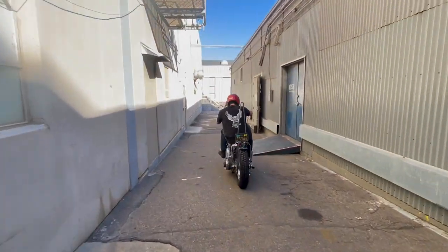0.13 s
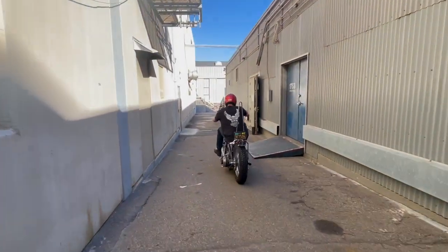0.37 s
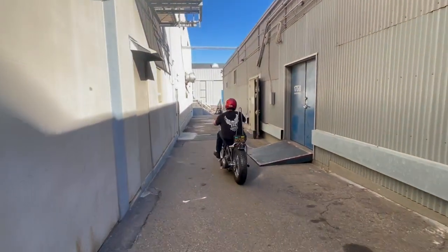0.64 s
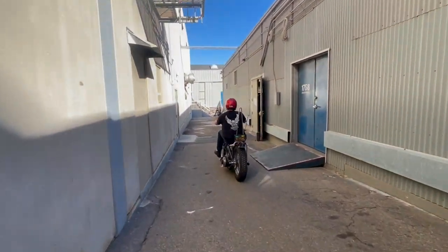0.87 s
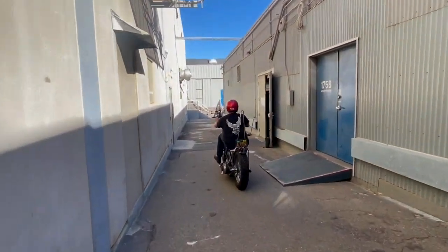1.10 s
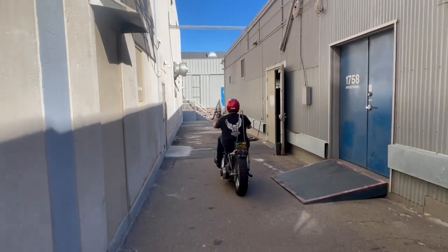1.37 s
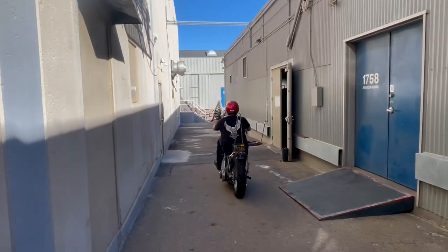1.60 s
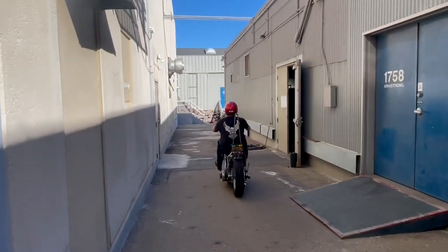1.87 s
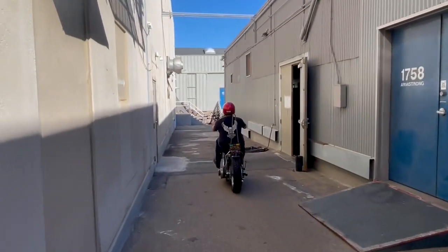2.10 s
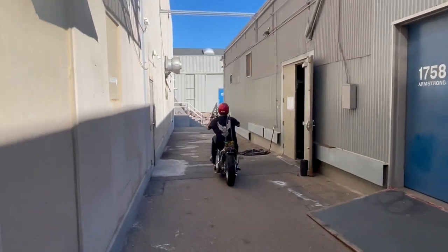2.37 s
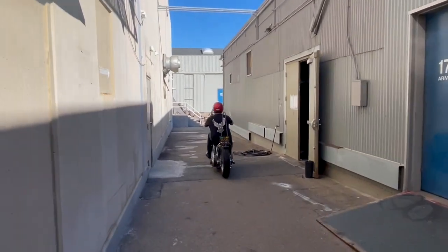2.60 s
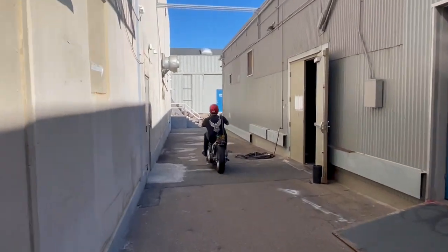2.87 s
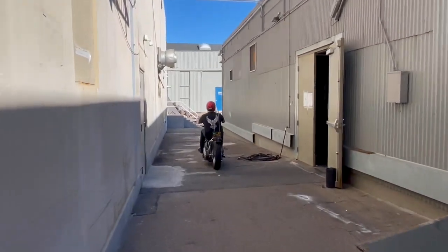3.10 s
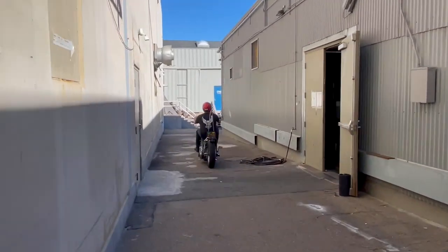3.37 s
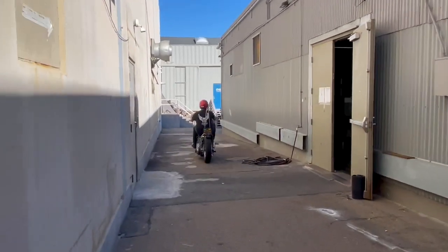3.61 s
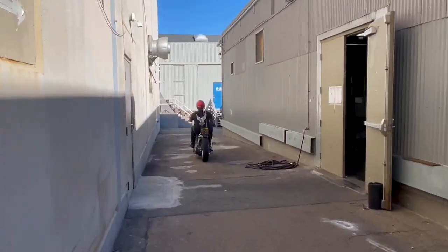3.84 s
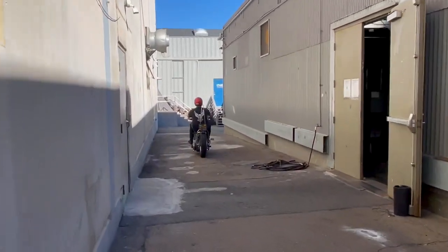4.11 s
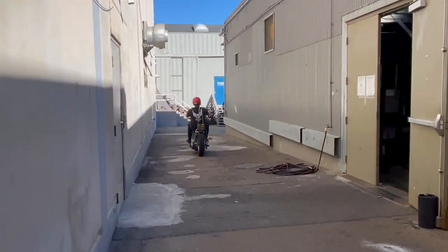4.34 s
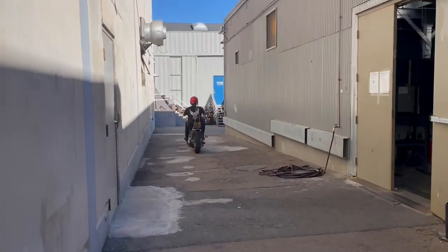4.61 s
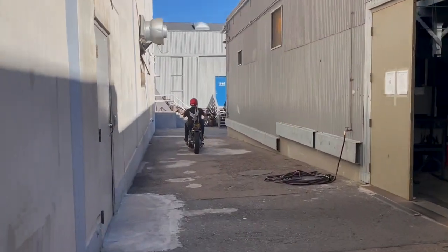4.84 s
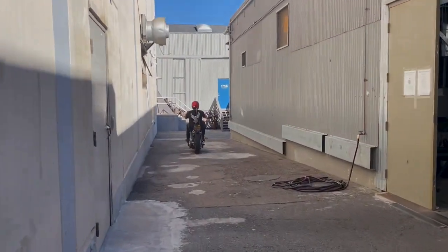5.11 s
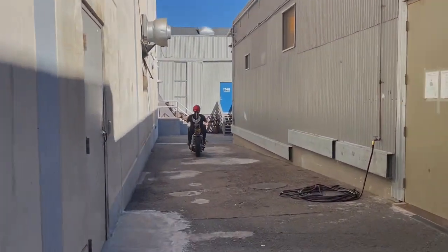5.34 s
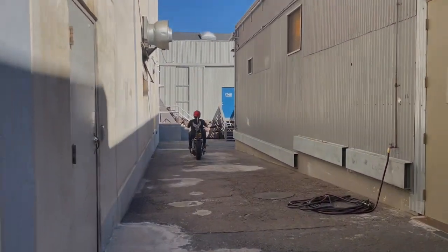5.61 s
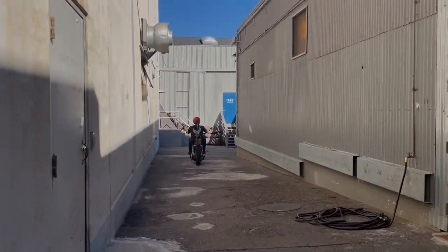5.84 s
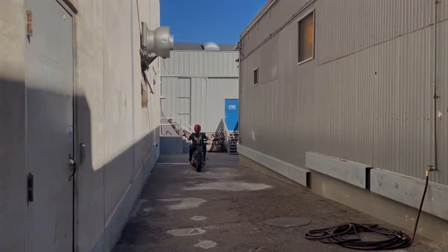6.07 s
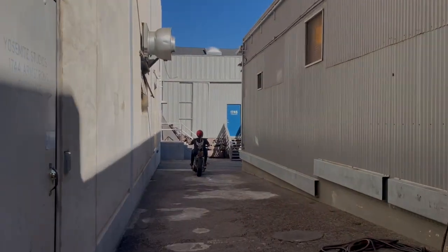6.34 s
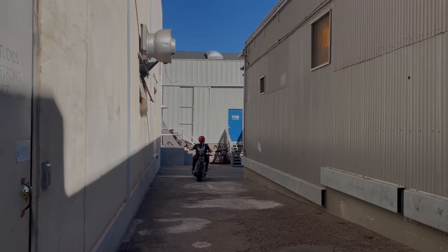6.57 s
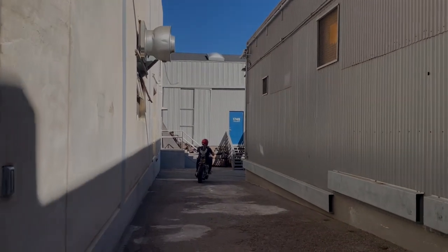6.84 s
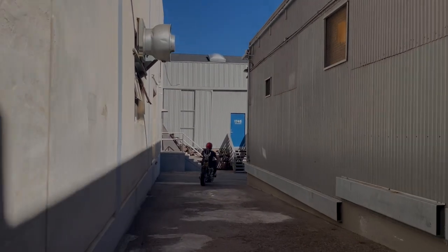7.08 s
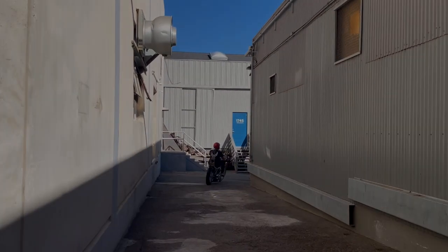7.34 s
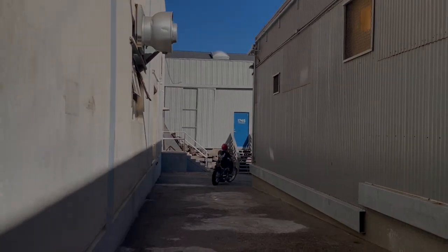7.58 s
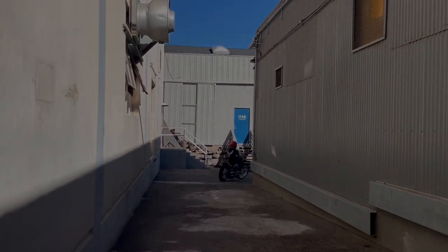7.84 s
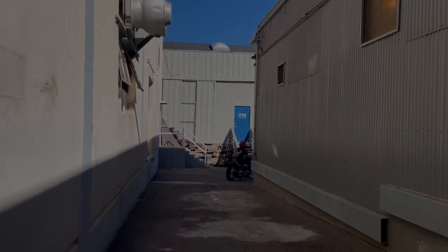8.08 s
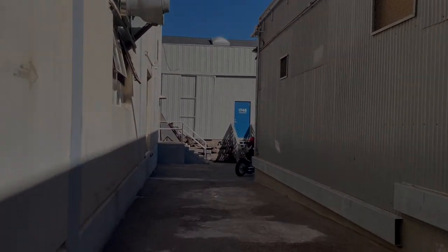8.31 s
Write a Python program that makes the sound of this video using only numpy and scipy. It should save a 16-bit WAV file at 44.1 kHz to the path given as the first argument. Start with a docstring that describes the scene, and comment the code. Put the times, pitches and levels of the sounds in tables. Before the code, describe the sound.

A V-twin motorcycle with loud open pipes rides away down a narrow alley of sheet metal and concrete, heard on a handheld stereo phone. At 0 s a hard crack and brief throttle burst give way to low, lumpy puffing and droning with small ticks. From 0.85 to 1.9 s bursts come close together, with bright rapid snaps, raspy barks, thumps and rushing gas, densest around 1.5 s. A weak blip at 2.1 s leads into a slow, stumbling lull; more bursts follow at 2.7-3.2, 3.7 and 4.2-4.4 s. It then coasts and slows, puffing deeply, until revs at 5.4-6.0 and 6.4-6.6 s. A strong, duller volley hits at 7.25-7.5 s, then a double blip at 8.1-8.45 s closes abruptly. Mechanical hiss and faint yard murmur run throughout, with wall echoes under a second long.

```python
"""A motorcycle with a V-twin engine and open pipes rides off down a narrow alley, followed on foot with a phone.
It opens with a crack and a short burst of throttle, over the hiss of chain, valves and tyres.
Off the throttle the pipes puff and drone; on each later burst the firings snap, bark and thump again.
The snaps get duller on average as it draws away, until a last double burst near the end.
Sheet-metal and concrete walls echo it all; two microphone ports hear it with different lag and level."""
import sys
import numpy as np
from scipy import signal
from scipy.fft import rfft, irfft, next_fast_len
from scipy.io import wavfile
from scipy.ndimage import uniform_filter1d, minimum_filter1d

SR = 44100
rng = np.random.default_rng(int(sys.argv[2]) if len(sys.argv) > 2 else 0)


def waveform_to_disk(signal):
    """Save audio, clipped to [-1, 1], as 16-bit WAV at the path in sys.argv[1]."""
    frames = np.transpose(np.atleast_2d(signal))
    scaled = np.clip(frames, -1, 1) * 32767
    samples = np.round(scaled).astype(np.int16)
    wavfile.write(sys.argv[1], SR, samples)


def field_ratio(decibels):
    """Amplitude ratio for a level in dB (20 dB per decade); scalars and array-likes work."""
    return 10 ** (np.asarray(decibels, dtype=float) / 20)


N = 372644  # length in samples


def curve(table, n):
    """Join (freq_hz, value) points on a log-frequency axis, one value per bin."""
    hz, value = np.transpose(table)
    return np.interp(np.log(np.fft.rfftfreq(n, 1 / SR) + 1), np.log(hz), value)


def colour(x, table):
    """Filter a sound by (freq_hz, level_db) points."""
    n = next_fast_len(x.shape[-1])
    return irfft(rfft(x, n) * field_ratio(curve(table, n)), n)[..., :x.shape[-1]]


def noise(table):
    """Coloured noise, rms 1."""
    x = colour(rng.standard_normal(N), table)
    return x / np.sqrt(np.mean(x ** 2))


def train(times, sizes):
    """One click per time."""
    out = np.zeros(N)
    np.add.at(out, np.clip((times * SR).astype(int), 0, N - 1), sizes)
    return out


def add(out, s, grain):
    """Mix a short sound in at time s."""
    i = max(int(s * SR), 0)
    out[i:i + len(grain)] += grain[:N - i]


def fall(x, seconds):
    """Every click dies away with this time constant."""
    return signal.lfilter([1], [1, -np.exp(-1 / (seconds * SR))], x)


def swell(x, rise_s, fall_s):
    """Every click rises, then dies away."""
    return fall(x, fall_s) - fall(x, rise_s)


def ring(times, sizes, modes, uneven_db, push_s):
    """Each soft push rings every mode of a pipe, a little differently every time."""
    chance = rng.standard_normal((len(times), len(modes)))
    out = 0
    for k, (hz, width_hz, db) in enumerate(modes):
        # a wider mode dies away sooner
        pole = np.exp((2j * np.pi * hz - np.pi * width_hz) / SR)
        blows = train(times, sizes * field_ratio(db + uneven_db * chance[:, k]))
        out = out + signal.lfilter([1], [1, -pole], blows).imag
    return uniform_filter1d(out, int(push_s * SR))


def walk(rate):
    """Random levels held 1 / rate s with sloping changes; spread near 1."""
    k = int(SR / rate)
    return uniform_filter1d(np.repeat(rng.standard_normal(N // k + 1), k), k)[:N]


def crackling(table, jump_db, shade_db, edges_hz):
    """Coloured noise in bands; the level of each jumps quickly and also shifts more slowly."""
    out, rest = 0, noise(table)
    for hz in edges_hz:
        band = signal.sosfilt(signal.butter(2, hz, fs=SR, output="sos"), rest)
        out = out + field_ratio(jump_db * walk(300) + shade_db * walk(35)) * band
        rest = rest - band
    return out + field_ratio(jump_db * walk(300) + shade_db * walk(35)) * rest


CRUISE_HZ = 12  # four-stroke cycles per second
# Engine speed over time: time_s, speed_hz (four-stroke cycles per second)
SPEED = [(0.0, 15.94), (0.56, 9.1), (0.76, 7.6), (1.0, 11.78), (1.4, 11.76), (1.68, 17.36), (1.8, 17.42),
         (1.88, 18.68), (2.2, 9.86), (2.48, 7.21), (2.6, 5.22), (2.76, 8.97), (2.84, 5.98), (3.2, 14.48),
         (3.48, 12.14), (3.64, 10.56), (3.8, 13.03), (4.2, 11.03), (4.28, 12.47), (4.4, 14.49), (5.4, 4.18),
         (5.64, 8.48), (5.76, 9.28), (6.0, 16.65), (6.4, 12.62), (6.64, 17.65), (6.72, 13.16), (6.8, 14.64),
         (7.2, 9.01), (7.28, 9.71), (7.5, 15.42), (7.76, 11.6), (8.12, 9.61), (8.45, 15.52)]


def octaves(s):
    """Engine speed at these moments, in octaves above cruising."""
    return np.log2(np.interp(s, *np.transpose(SPEED)) / CRUISE_HZ)


UPPER_DB_PER_OCT = 7.5  # the upper pipe modes grow with speed
# What the walls and road along the alley favour:
# time_s, upper_pipe_db, lowest_bark_db, road_dip_depth (0-1)
ALONG_ALLEY = [(0, 20.5, -2, 0), (.3, 15.5, -6, 0.3), (.9, 16.5, -12, 0.5), (1.4, 16, -15.5, 0.7),
               (1.9, 20.5, -42, 0.77), (2.3, 13.5, -8, 1), (2.7, 17, -13, 0.87), (3.1, 15.5, -9.5, 0.9),
               (3.8, 14, -5.5, 0.72), (4.3, 14.5, -4, 0.73), (5.0, 0, 8, 0.82), (5.6, 11, -5.5, 0.76),
               (6.0, 12, -4.5, 0.54), (6.5, 10.5, -8.5, 0.17), (7.4, 13.5, -14.5, 0.49),
               (8.3, 11.5, -13, 0.7)]


def ride(s):
    """Gains of the upper pipe modes and of the lowest bark mode at these moments."""
    at, upper_db, low_db, _ = np.transpose(ALONG_ALLEY)
    upper = field_ratio(np.interp(s, at, upper_db) + UPPER_DB_PER_OCT * octaves(s))
    return upper, field_ratio(np.interp(s, at, low_db))


CYCLE_AT_START, REAR_FIRES_AT = -.0142, .5744  # in cycles; the front cylinder fires at whole cycles
# Spans in which the engine skips every firing: start_s, end_s
MISFIRES = [(1.07, 1.2), (1.32, 1.37), (2.31, 2.36), (2.77, 2.92), (3.15, 3.19), (3.23, 3.26), (3.49, 3.53),
            (3.8, 3.83), (3.87, 3.91), (4.29, 4.33), (4.37, 4.4), (5.02, 5.1), (5.6, 5.67), (5.72, 5.78),
            (6.33, 6.37), (8.23, 8.27)]
# Bursts of throttle: open_s, shut_s, thump_db, bark_db, gas_db (relative levels)
BLIPS = [(0, 0.06, -14.5, -24.5, -25), (0.843, 1.06, -17, -21.5, -23.5), (1.203, 1.32, -16.5, -23.5, -25.5),
         (1.405, 1.7, -13, -21, -22.5), (1.71, 1.88, -15, -18, -34), (2.08, 2.17, -24, -19, -29),
         (2.66, 2.76, -11.5, -21, -21.5), (2.925, 3.23, -11, -25.5, -23.5),
         (3.676, 3.87, -11.5, -24.5, -32), (4.165, 4.44, -13, -18, -29.5), (5.44, 5.72, -11.5, -25, -28.5),
         (5.785, 6.03, -17, -28.5, -29.5), (6.396, 6.64, -15, -28, -34.5), (7.25, 7.53, -11, -20, -29.5),
         (8.085, 8.22, -16.5, -26.5, -35), (8.27, 8.45, -13, -19.5, -31.5)]


def crank():
    """Firing times, front cylinder or not, and the blip each falls in (-1: throttle shut)."""
    t = np.arange(N) / SR
    cycle = CYCLE_AT_START + np.cumsum(np.interp(t, *np.transpose(SPEED))) / SR
    whole = np.arange(int(cycle[-1]) + 1)
    due = np.ravel([whole, whole + REAR_FIRES_AT], order="F")
    due = due[due < cycle[-1]]
    s = np.interp(due, cycle, t)
    fired = ~np.any([(s > a) & (s < b) for a, b in MISFIRES], axis=0)
    blip = np.full(len(s), -1)
    for k, row in enumerate(BLIPS):
        blip[(s >= row[0]) & (s < row[1])] = k
    return s[fired], (due % 1 == 0)[fired], blip[fired]


def nearest(s, table):
    """Index of the firing that each row belongs to."""
    return np.abs(s[:, None] - np.array(table)[:, 0]).argmin(axis=0)


# ordinary firings; their snap gets duller as the bike draws away
SNAP_OVER_GAS_DB, SNAP_HZ, SNAP_FADE_OCT_PER_S = 12, 3120, 0.164
POWER_SCATTER_DB, GAS_SCATTER_DB = 4, 0.5
GAS_PER_PUNCH, BARK_PER_PUNCH = 0.3, 1  # dB per dB of extra thump
GAS_PER_SNAP = 0.17  # a harder snap carries more gas (dB per dB)
GAS_DB_PER_SNAP_OCT = 1.5  # a dull snap hisses less
REAR_BARK_DB = 4.5  # the rear pipe barks harder
BARK_PUSH_DB = 3  # push into the pipe above the listed bark level
# Cracks on the throttle, hard and faint:
# time_s, snap_db (relative), snap_hz, punch_db (thump above its blip's)
CRACKS = [(-.006, -1.5, 2730, 6), (.035, -15.5, 1155, -0.5), (.867, -9.5, 3440, 0.5),
          (0.908, -12.5, 3750, 3), (.963, -20, 4510, 2), (.999, -8.5, 1686, 6), (1.048, -18, 1160, 5),
          (1.223, -16.5, 2880, 1.5), (1.256, -12.5, 2570, 5.5), (1.305, -19.5, 3680, 0.5),
          (1.421, -8, 2020, 2), (1.468, -4, 2770, 3), (1.501, -4, 2015, 2.5), (1.542, -15, 2030, 4),
          (1.571, -0.5, 2070, 3.5), (1.607, -8, 3000, -4), (1.633, -2.5, 2100, 0.5),
          (1.67, -11.5, 3110, -4), (1.693, -3, 1980, 1), (1.727, -13, 2920, 1), (1.749, -6.5, 2170, -6),
          (1.805, -8.5, 2150, -2), (2.083, -25, 3450, -7), (2.688, -22, 3700, -3),
          (2.743, -11.5, 2650, -1.5), (2.951, -15.5, 3580, -4), (2.999, -15, 3440, -0.5),
          (3.056, -8.5, 985, 1), (3.092, -4, 2840, 3.5), (3.137, -3.5, 1046, 2.5),
          (3.209, -13.5, 3880, 1.5), (3.696, -19, 3830, 0.5), (3.731, -15.5, 3970, 0.5),
          (3.778, -12.5, 4700, -2.5), (3.855, -18.5, 5400, -1), (4.192, -7, 1470, -1.5),
          (4.23, -11, 3700, 3.5), (4.276, -2, 1078, 3), (4.353, -3, 1354, 4), (4.425, -19.5, 1080, 2.5),
          (5.491, -11.5, 940, 0.5), (5.576, -15, 1570, -1), (5.696, -7.5, 1013, -0.5),
          (5.804, -10.5, 1490, 7), (5.841, -8.5, 4140, 12), (5.887, -13.5, 1960, 7.5),
          (5.917, -7, 1780, 11), (5.957, -4, 1144, 12), (5.984, -3, 940, 3), (6.02, -29, 1890, 2.5),
          (6.391, -24, 1240, 8), (6.435, -9, 1570, 6), (6.467, -16.5, 1920, 3.5), (6.507, -13.5, 1560, 2.5),
          (6.537, -11.5, 1300, 9.5), (6.572, -13.5, 1565, -3), (6.596, -11.5, 1430, 4.5),
          (7.28, -10.5, 986, -1), (7.323, -7.5, 1450, 4), (7.372, -5.5, 1426, 2), (7.406, 0, 1570, 5),
          (7.449, -7, 1570, 3), (7.478, 1.5, 1492, 4.5), (8.112, -20, 3980, 1.5), (8.154, -15, 2570, 5.5),
          (8.205, -17, 1360, 4.5), (8.289, -20, 3700, 2), (8.324, -15.5, 1600, 3), (8.368, -9.5, 1620, 2),
          (8.396, -10, 1605, 6), (8.435, -21, 2600, 0)]
# Barks with a level of their own: time_s, bark_db (relative, before the push above)
BARKS = [(0.867, -23), (0.91, -22), (0.962, -19.5), (1.001, -12), (1.258, -18.5), (1.304, -18),
         (1.469, -8.5), (1.5, -21), (1.543, -6.5), (1.61, -8), (1.634, -15), (1.67, -11), (1.727, -11.5),
         (1.751, -14), (1.806, -17), (2.692, -25.5), (2.954, -19), (3.093, -21.5), (3.137, -18.5),
         (3.211, -14.5), (3.778, -21.5), (3.856, -20), (4.275, -21), (4.353, -15), (4.424, -19.5),
         (5.577, -18), (5.697, -20), (5.803, -16.5), (5.84, -13), (5.889, -10.5), (5.959, -10),
         (6.436, -13.5), (6.467, -12.5), (6.507, -16), (6.535, -17.5), (6.571, -17.5), (6.596, -13.5),
         (7.324, -17.5), (7.453, -14.5), (7.48, -14)]


def on_throttle():
    """Each firing takes its blip's levels, a little scattered; listed cracks and barks have their own."""
    s, front, blip = crank()
    is_open = blip >= 0
    chance = rng.standard_normal((len(s), 5))[is_open].T
    rear = ~front[is_open]
    s = s[is_open]
    thump_db, bark_db, gas_db = np.array(BLIPS)[blip[is_open], 2:].T
    snap_db = gas_db + SNAP_OVER_GAS_DB + GAS_SCATTER_DB * chance[0]
    snap_hz = SNAP_HZ * 2 ** (0.66 * chance[1] - SNAP_FADE_OCT_PER_S * s)
    punch_db = POWER_SCATTER_DB * chance[2]
    k = nearest(s, CRACKS)
    s[k], snap_db[k], snap_hz[k], punch_db[k] = np.transpose(CRACKS)
    bark_db = bark_db + BARK_PER_PUNCH * punch_db + REAR_BARK_DB * rear
    bark_db[nearest(s, BARKS)] = np.array(BARKS)[:, 1] + BARK_PUSH_DB
    extra_snap_db = snap_db - gas_db - SNAP_OVER_GAS_DB
    gas_db = gas_db + GAS_SCATTER_DB * chance[3] + GAS_PER_PUNCH * punch_db
    gas_db = gas_db + GAS_PER_SNAP * extra_snap_db + GAS_DB_PER_SNAP_OCT * np.log2(snap_hz / SNAP_HZ)
    return s, snap_db, snap_hz, gas_db, thump_db + punch_db, bark_db


def snap(s, snap_db, snap_hz):
    """The shock front leaves the pipe as a short pitched burst and a broad crack."""
    t = np.arange(int(0.01 * SR)) / SR
    shape = np.exp(-t / .0035) - np.exp(-t / .0012)
    crack_shape = np.exp(-t / 0.0019) - np.exp(-t / 0.0005)
    out = np.zeros(N)
    for at, db, hz in zip(s, snap_db, snap_hz):
        # turbulence makes the snap's pitch stumble
        stumble = np.cumsum(rng.standard_normal(len(t))) * .19
        add(out, at, field_ratio(db - 4.0) * shape * np.sin(2 * np.pi * hz * t + stumble))
        # the front itself is a broad, short crack
        rush = uniform_filter1d(rng.standard_normal(len(t)), size=5)
        add(out, at, field_ratio(db - 9) * crack_shape * rush)
        # a weaker second front of another pitch follows
        late_s, shift = rng.uniform(.004, .014), 2 ** rng.uniform(-0.79, 1.2)
        second = np.sin(2 * np.pi * hz * shift * t + stumble[::-1])
        add(out, at + late_s, field_ratio(db - 9.5) * shape * second)
    return out


# Colour of the rushing gas: freq_hz, level_db (per Hz, relative)
GAS = [(800, 3.5), (2100, -0.5), (2700, 1), (3800, 1), (5200, -1), (6100, 1), (7000, -3), (13500, -0.5),
       (15800, -3.5), (16600, -50)]


def gas_rush(s, gas_db):
    """Gas rushes out as crackling noise whose level jumps every few milliseconds."""
    # a second, uneven burst follows the first
    late_s, late_db = rng.uniform((.004, -11.), (.018, -1.), (len(s), 2)).T
    bursts = train(s, field_ratio(gas_db + 5.0)) + train(s + late_s, field_ratio(gas_db + 2.5 + late_db))
    edges_hz = [1300., 2170.0, 3200.0, 4480.0, 5170.0, 8700.0]
    return swell(bursts, .0018, .0055) * crackling(GAS, 4.26, 3.63, edges_hz)


# Pipe modes heard as the bark: freq_hz, width_hz, level_db (relative)
BARK = [(525.6, 62, 1.5), (600, 76, 4), (693, 82, -7)]


def bark(s, bark_db):
    """Each firing rings the middle pipe modes and adds a short burst of raspy noise."""
    low_gain = ride(s)[1]
    low = ring(s + 0.0023, field_ratio(bark_db + 3.5) * low_gain, BARK[:1], uneven_db=3.5, push_s=0.00017)
    high = ring(s + .002, field_ratio(bark_db - 6.0), BARK[1:], uneven_db=0.5, push_s=0.00072)
    rasp_colour = [(300, -9.0), (430, -29.0), (560, 3.0), (1300, -9.5), (2200, -48.0)]
    rasp = swell(train(s, field_ratio(bark_db - 4)), 0.0042, 0.0093) * noise(rasp_colour)
    return low + high + rasp


DEEP_FADE_DB_PER_S = .7  # the deepest pipe mode thins along the alley
# Low pipe modes, heard as the thump: freq_hz, width_hz, level_db (relative)
LOW_PIPE = [(62.4, 43, 5), (118.7, 22.6, 3.5), (157.6, 28, 3)]
# Upper pipe modes, heard as a growl on and off the throttle: freq_hz, width_hz, level_db (relative)
UPPER_PIPE = [(201.5, 34, -15.5), (238.8, 38, -15.5), (293.5, 47, -12)]


def thump(s, thump_db):
    """A slower push rings the low pipe modes, with a growl from the upper ones."""
    low = ring(s + 0.0058, field_ratio(thump_db - 5.0), LOW_PIPE[1:], uneven_db=2.0, push_s=0.0026)
    deep_size = field_ratio(thump_db - 1.5 - DEEP_FADE_DB_PER_S * s)
    deep = ring(s + 0.0059, deep_size, LOW_PIPE[:1], uneven_db=1.0, push_s=0.0034)
    growl_size = field_ratio(thump_db - 7.0) * ride(s)[0]
    growl = ring(s + 0.00581, growl_size, UPPER_PIPE, uneven_db=2.5, push_s=0.0017)
    return low + deep + growl


INTAKE_DB, INTAKE_LEAD_S = -9.5, 0.02  # relative to the gas; ahead of the first firing


def intake(s, gas_db):
    """The intake hisses as the throttle opens, just before the first firing."""
    first = np.diff(s, prepend=0) > .15  # seconds since the firing before it
    clicks = train(s[first] - INTAKE_LEAD_S, field_ratio(gas_db[first] + INTAKE_DB))
    return swell(clicks, 0.0022, 0.026) * noise([(1500, -20)] + GAS[2:])


def power_strokes():
    """The shock front snaps out of the pipe with a rush of gas; bark and slower thump follow."""
    s, snap_db, snap_hz, gas_db, thump_db, bark_db = on_throttle()
    strokes = gas_rush(s, gas_db) + bark(s, bark_db) + thump(s, thump_db) + intake(s, gas_db)
    return snap(s, snap_db, snap_hz), strokes


# Colour of the mechanical hiss and yard murmur: freq_hz, level_db (per Hz, relative)
GEAR = [(180, 4.5), (300, 3.5), (700, 1.5), (1200, -8), (3000, -12), (3600, -13), (4200, -18.5),
        (5300, -17), (5800, -10.5), (6400, -14), (7000, -22.5), (14000, -24), (16600, -46)]


def running_gear():
    """Chain, valves and tyres hiss louder the faster the engine turns, over a steady murmur of the yard."""
    flicker_db = 3.9 * walk(30) + 4.8 * walk(250)
    hiss = field_ratio(-46 + 20.0 * octaves(np.arange(N) / SR) + flicker_db)
    murmur = field_ratio(-51.0)
    return (hiss + murmur) * noise(GEAR)


# relative levels at cruising speed
PUFF_DB, PUFF_DB_PER_OCT, FRONT_PUFF_DB, PUFF_SCATTER_DB = -25.5, 5, 6.5, 1.5
TICK_DB, TICK_DB_PER_OCT, TICK_FADE_DB_PER_S, TICK_SCATTER_DB = -25, 2, 2, 1.5
PUFF_RECOVERY_DB_PER_S = 2.5  # growth since the throttle shut
PUFF_GAIN_DB_PER_S = .5  # growth along the alley, which guides the bass
# Stray pops with the throttle shut: time_s, tick_db, puff_db (relative levels)
STRAY_POPS = [(0.358, -20.5, -15.5), (0.797, -18, -15), (2.381, -26.5, -19.5), (2.446, -19.5, -15.5),
              (3.277, -26, -14), (3.64, -23.5, -14), (3.962, -26, -13.5), (4.452, -46, -10),
              (4.993, -23.5, -13.5), (6.241, -37, -12.5), (7.113, -30, -10.5), (7.948, -25, -11)]


def off_throttle():
    """Puffs and ticks follow the speed, the front cylinder puffs harder, ticks fade with distance."""
    s, front, blip = crank()
    shut = blip < 0
    chance = rng.standard_normal((len(s), 2))[shut].T
    s, front = s[shut], front[shut]
    puff_db = PUFF_DB + PUFF_DB_PER_OCT * octaves(s) + FRONT_PUFF_DB * front + PUFF_SCATTER_DB * chance[0]
    shut_s = np.array(BLIPS)[:, 1]
    since_s = s - shut_s[np.maximum(np.searchsorted(shut_s, s) - 1, 0)]
    puff_db = puff_db + PUFF_RECOVERY_DB_PER_S * since_s + PUFF_GAIN_DB_PER_S * s
    tick_db = TICK_DB + TICK_DB_PER_OCT * octaves(s) - TICK_FADE_DB_PER_S * s
    tick_db = tick_db + TICK_SCATTER_DB * chance[1]
    k = nearest(s, STRAY_POPS)
    s[k], tick_db[k], puff_db[k] = np.transpose(STRAY_POPS)
    return s, tick_db, puff_db, front


PUFF_RING_DB = 2.5  # the puff grows as its pitch steps up


def puff(s, puff_db, step_s):
    """Each weak firing is a soft tone whose pitch climbs to the pipe's drone."""
    t = np.arange(int(.25 * SR)) / SR
    shape = np.exp(-t / 0.049) - np.exp(-t / 0.0054)
    out = np.zeros(N)
    for at, db, step, (a, b) in zip(s, puff_db, step_s, rng.standard_normal((len(s), 2))):
        # falls smoothly from near 1 to 0 around the step in pitch
        low = 1 / (1 + np.exp((t - step * (1 + 0.062 * np.tanh(b))) / 0.0087))
        hz = 141 * (1 + 0.029 * a) - 75 * low
        wander = 0.0036 * np.cumsum(rng.standard_normal(len(t)))
        tone = np.sin(2 * np.pi * np.cumsum(hz) / SR + wander)
        add(out, at, field_ratio(db - PUFF_RING_DB * low) * shape * tone)
    return out


PUFF_STEP_CYCLES = .28  # when the puff's pitch steps up after its firing
REAR_MURMUR_DB = 0.5
# Pipe modes that murmur as the puff's pitch steps up: freq_hz, width_hz, level_db (relative)
MURMUR = [(432, 47, -3.5), (580, 60, -7), (682, 34, -2.5)]


def coasting():
    """Weak firings puff, growl and murmur in the pipe; a tick marks each in the treble."""
    s, tick_db, puff_db, front = off_throttle()
    step_s = PUFF_STEP_CYCLES / np.interp(s, *np.transpose(SPEED))
    puffs = puff(s, puff_db, step_s)
    growl_size = field_ratio(puff_db - 2.5) * ride(s)[0]
    growl = ring(s + .004, growl_size, UPPER_PIPE, uneven_db=2., push_s=.003)
    tick_colour = [(1500, -12.0), (3500, -0.5), (4800, -6.), (6000, 0.0), (7200, -7.),
                   (13000, -8.5), (15800, -12.0), (16600, -53.0)]
    ticks = swell(train(s, field_ratio(tick_db - 6.5)), 0.0011, 0.008) * noise(tick_colour)
    murmur_size = field_ratio(puff_db - 10.5 + REAR_MURMUR_DB * ~front)
    murmur = ring(s + step_s, murmur_size, MURMUR, uneven_db=3.0, push_s=0.0011)
    return puffs + growl + murmur + ticks


# The road's mirror image cancels a band: freq_hz, level_db
GROUND_DIP = [(320, 0.), (370, -10.5), (440, -10.5), (510, 0.5)]


def road_dip(bike):
    """The reflection off the road thins one band, by a depth that varies along the alley."""
    depth = np.clip(np.interp(np.arange(N) / SR, *np.array(ALONG_ALLEY)[:, [0, 3]].T), 0, 1)
    return (1 - depth) * bike + depth * colour(bike, GROUND_DIP)


# How long the alley's echo takes to fall by 60 dB: freq_hz, decay_s
ALLEY_T60 = [(100, 0.82), (500, 0.6), (2000, 0.75), (6000, 0.3), (14000, 0.2)]


def alley(x, hop_s):
    """Two unrelated echo tails; their fine pattern changes as bike and listener move."""
    t = np.arange(int(.9 * SR)) / SR
    hop = int(hop_s * SR)
    out = np.zeros((2, N + 3 * hop + len(t)))
    padded = np.concatenate([np.zeros(hop), x, np.zeros(2 * hop)])
    for i in range(0, N + hop, hop):
        spectrum = rfft(rng.standard_normal((2, len(t))))
        tail = 0
        for hz, t60 in ALLEY_T60:
            # overlapping bands that add up to one, each dying at its own rate
            band = curve([(f, f == hz) for f, _ in ALLEY_T60], len(t))
            tail = tail + irfft(spectrum * band, len(t)) * field_ratio(-60 * t / t60)
        # single wall echoes stand out of the tail
        echoes_db = 4.5 * walk(200)[:len(t)]
        onset = np.clip(t / 0.0073 - .4, 0, 1)
        tail = tail * field_ratio(echoes_db) * onset / np.sqrt(SR)
        # overlapping pieces crossfade from one tail to the next
        piece = padded[i:i + 2 * hop] * np.hanning(2 * hop)
        out[:, i:i + 2 * hop + len(t) - 1] += signal.fftconvolve(piece[None], tail, axes=1)
    return out[:, hop:hop + N]


# Level of the left port above the right: freq_hz, level_db
LEFT_MINUS_RIGHT = [(60, .5), (200, 2.), (700, 7.), (1300, 2.), (2400, .3), (8000, 0)]
# Phase by which the left channel leads the right: freq_hz, phase_radians
LEFT_LEADS = [(400, 0), (1000, 1.46), (3000, -1.5), (4800, 0.6), (6000, -14.5), (7000, 0.03), (9200, np.pi),
              (11300, np.pi), (12200, 8), (14500, 2 * np.pi)]


def two_ports(both, unlike):
    """Level and phase differ between the ports. Separately, near 10 kHz the two channels are set in opposite
    phase, so their sum falls silent there."""
    n = next_fast_len(N)
    # each channel takes half of the difference
    skew = np.sqrt(field_ratio(curve(LEFT_MINUS_RIGHT, n))) * np.exp(.5j * curve(LEFT_LEADS, n))
    left = irfft(rfft(both + unlike, n) * skew, n)[:N]
    right = irfft(rfft(both - unlike, n) / skew, n)[:N]
    return np.array([left, right])


# Colour of the echo that differs between the ports: freq_hz, level_db (relative)
SCATTER = [(60, -53), (200, -25), (600, -12.5), (1500, -14), (4000, -10), (7000, -6.5), (9000, -10),
           (11500, -31), (13000, -4)]


def scene():
    """Direct sound and echo reach both ports; part of the echo differs between them."""
    snaps, strokes = power_strokes()
    bike = road_dip(strokes + running_gear() + coasting())
    # the snap beams straight back along the alley, so the walls get less of it
    snap_share = .35
    shared, unlike = alley(bike + snap_share * snaps, hop_s=.3)
    echo_colour = [(100, 8.7), (300, 14.7), (410, 19.5), (560, 8.9), (1200, 8.9), (4000, 14.0)]
    both = bike + snaps + colour(shared, echo_colour)
    return two_ports(both, field_ratio(22.0) * colour(unlike, SCATTER))


def roll_off(x):
    """The treble ends steeply here."""
    return signal.sosfilt(signal.butter(12, 16730, fs=SR, output="sos"), x)


def record(dry):
    """The phone cuts the deep bass steeply; a limiter turns both channels down around the loudest peaks."""
    x = signal.sosfilt(signal.butter(8, 55., "high", fs=SR, output="sos"), dry)
    top_hz = 16200
    x = signal.sosfilt(signal.butter(8, top_hz, fs=SR, output="sos"), x)
    peak = -minimum_filter1d(-np.abs(x).max(axis=0), size=600)
    gain = uniform_filter1d(np.minimum(.9 / (peak + 1e-9), 1), size=300)
    return roll_off(x * gain)


dry = scene()
out = record(dry)
waveform_to_disk(out)
```